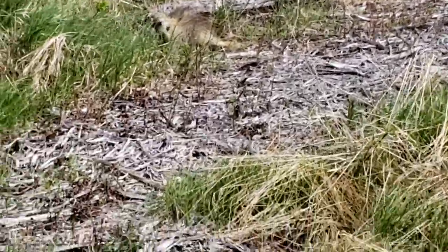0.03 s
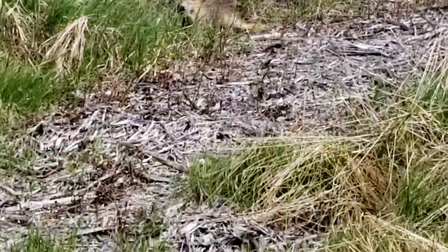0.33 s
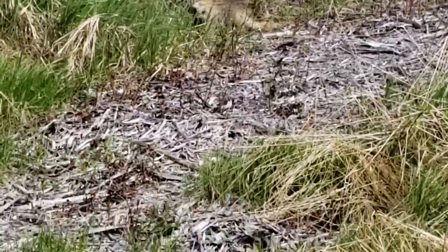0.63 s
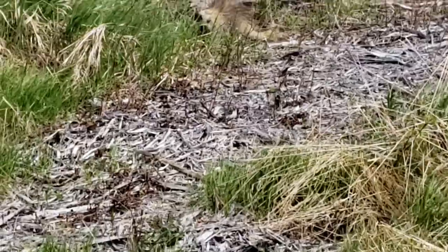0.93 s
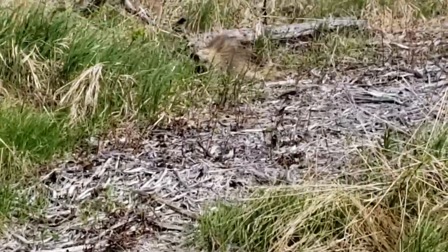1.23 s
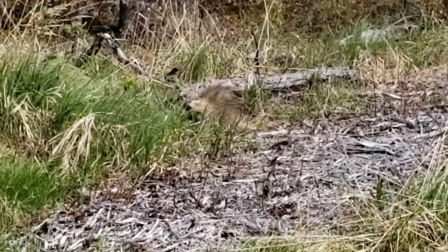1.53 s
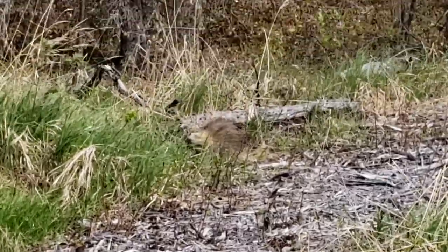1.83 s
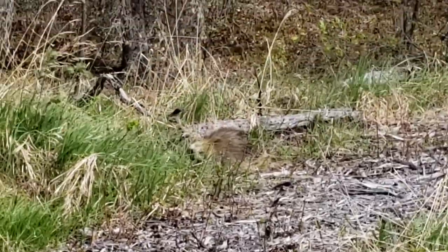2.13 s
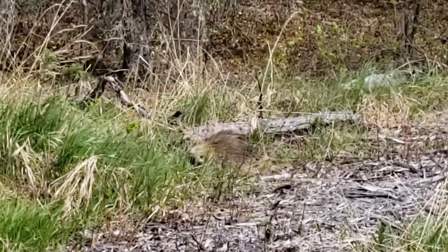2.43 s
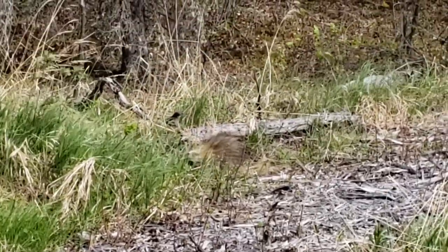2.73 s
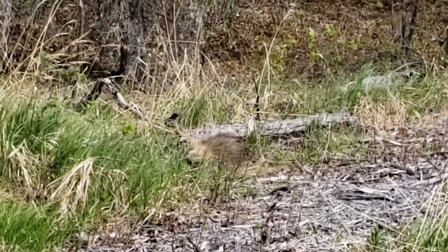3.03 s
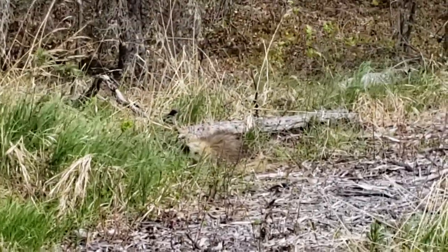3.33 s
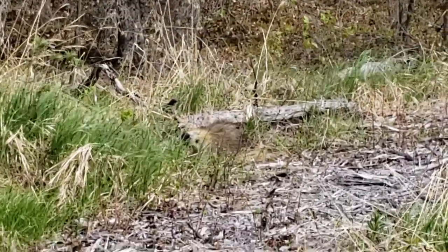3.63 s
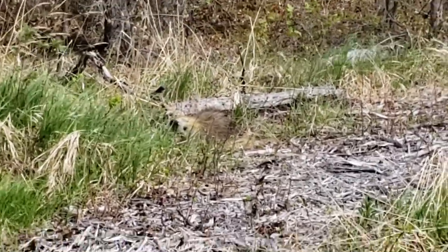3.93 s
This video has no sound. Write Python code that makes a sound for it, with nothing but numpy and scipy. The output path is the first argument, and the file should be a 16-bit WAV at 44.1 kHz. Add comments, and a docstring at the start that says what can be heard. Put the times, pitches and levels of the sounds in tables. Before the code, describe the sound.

Wind buffets a hand-held microphone with a low rumble and a few hollow knocks, then fades into quiet outdoor hiss. Twigs tick, a small bird whistles faintly, and one slow step crunches dry leaves close by.

```python
"""Gust at the edge of a wood

Wind buffets the two ports of a hand-held stereo microphone, with a few hollow handling knocks,
then dies away into quiet outdoor hiss.
Dry twigs and leaves tick on the ground, then crack and crunch under one slow step close by.
Farther off, to the left, a small bird whistles three times and the trees echo it."""
import sys
import numpy as np
from scipy import signal
from scipy.fft import rfft, irfft, next_fast_len
from scipy.io import wavfile
from scipy.ndimage import map_coordinates

SR = 44100
rng = np.random.default_rng(int(sys.argv[2]) if len(sys.argv) > 2 else 0)


def digitize_waveform(pressure):
    """Quantize a signal to 16-bit integers and store it at the path in sys.argv[1].

    Rows of a 2-D input are taken as channels; values are limited to [-1, 1].
    """
    field = np.atleast_2d(pressure).T
    bounded = np.clip(field, -1, 1)
    quanta = np.round(bounded * 32767).astype(np.int16)
    wavfile.write(sys.argv[1], SR, quanta)


N = 4 * SR


def amp(db):
    """Decibels to gain."""
    return 10 ** (np.asarray(db) / 20)


def unit(x):
    """Scaled to rms 1."""
    return x / np.sqrt(np.mean(x ** 2) + 1e-20)


def along(points, hz):
    """Read (f/Hz, value) points on a log frequency axis."""
    f, values = np.transpose(points)
    return np.interp(np.log(hz + 1), np.log(f + 1), values)


def curves(rows):
    """One value per sample for each column after the time."""
    times, *columns = np.transpose(rows)
    return [np.interp(np.arange(N) / SR, times, column) for column in columns]


def wobble(rate):
    """A smooth random curve for each port, rate knots a second."""
    knots = rng.standard_normal((2, 1000))
    return np.array([map_coordinates(k, [np.arange(N) * rate / SR], mode="mirror") for k in knots])


def filtered(x, response):
    """x through a frequency response."""
    n = x.shape[-1]
    padded = next_fast_len(n + 2048)
    return irfft(rfft(x, padded) * response(np.fft.rfftfreq(padded, 1 / SR)), padded)[..., :n]


def coloured(x, spectrum):
    """x shaped by a spectrum, rms 1."""
    return unit(filtered(x, lambda hz: amp(along(spectrum, hz))))


def noise(spectrum, n=N):
    """Unrelated noise in the two ports, rms 1."""
    return coloured(rng.standard_normal((2, n)), spectrum)


def pan(db):
    """Left and right gains, db apart, of mean power 1."""
    gains = amp([db / 2, -db / 2])
    return gains / np.sqrt(np.mean(gains ** 2, axis=0))


def add(out, start_s, x):
    """Mix x into out at start_s."""
    i = max(round(start_s * SR), 0)
    part = out[..., i:i + x.shape[-1]]
    part += x[..., :part.shape[-1]]


def swell(t, rise_s):
    """Rises to 1 at rise_s and dies away."""
    return t / rise_s * np.exp(1 - t / rise_s)


# Colour of the open air: f/Hz, relative level/dB
AIR_SPECTRUM = [(30, -2.5), (80, 0.5), (170, -10), (420, 3), (650, 0), (900, -3), (1400, -4), (2600, -6),
                (3800, 0.5), (6500, 0.5), (7300, -2), (8700, -21.5), (11000, -13), (13000, -14),
                (15500, -6)]
# Its lean across the microphone: f/Hz, left minus right/dB
AIR_PAN = [(400, 1.5), (1500, 1), (2600, 2), (4000, 0.5), (6500, 3.5), (9000, -2.5), (15000, -9.5)]
# Its slow fall: t/s, level/dB
AIR_LEVEL = [(0, -60.5), (2.9, -63.5)]


def air():
    """Quiet outdoor hiss all around the microphone."""
    level_db, = curves(AIR_LEVEL)
    return amp(level_db) * filtered(noise(AIR_SPECTRUM), lambda hz: pan(along(AIR_PAN, hz)))


# Top hiss at the right port: t/s, level/dB, power share of the wide band/0-1
SIZZLE_LEVEL = [(0, -61.5, 0.6), (.65, -61, 1), (.85, -64.5, 0.24), (2.5, -67, 0), (2.9, -68.5, 0)]
# Its wide band: f/Hz, relative level/dB
SIZZLE_WIDE = [(8000, -27.5), (10000, -18), (11500, -11), (15500, -9)]
# Its narrow band: f/Hz, relative level/dB
SIZZLE_NARROW = [(9000, -52), (12500, -37.5), (14000, 0), (15500, 0)]


def sizzle(left_db=-9):
    """A thin hiss at the very top, mostly on the right, that narrows as it fades."""
    level_db, wide = curves(SIZZLE_LEVEL)
    hiss = np.sqrt(wide) * noise(SIZZLE_WIDE) + np.sqrt(1 - wide) * noise(SIZZLE_NARROW)
    return amp(level_db) * hiss * amp([[left_db], [0]])


# Calls from the edge of the wood: t/s, level/dB, held pitch f/Hz
CALLS = [(1.026, -48, 3550), (3.052, -53.5, 3705), (3.476, -52.5, 3660)]
# Course of one call: t/s from its start, ratio to the held pitch, added level/dB
CALL_SHAPE = [(0, .98, -10), (0.022, 1, 2), (0.044, .98, -5.5), (.056, 0.74, 2.5), (0.068, 0.595, 1)]


def bird(rasp=2):
    """A thin whistle holds, then flicks down; the further it drops, the more its pitch scatters."""
    age, ratio, shape_db = np.transpose(CALL_SHAPE)
    out, t = np.zeros(N), np.arange(int(age[-1] * SR)) / SR
    glide = np.interp(t, age, ratio)
    envelope = amp(np.interp(t, age, shape_db)) * signal.windows.tukey(len(t), 0.1)
    for start_s, db, held_hz in CALLS:
        pitch_hz = held_hz * (glide + rasp * (1 - glide) * rng.standard_normal(len(t)))
        add(out, start_s, amp(db) * envelope * np.sin(2 * np.pi * np.cumsum(pitch_hz) / SR))
    return out


def from_trees(call, lag_s=0.00018, lean_db=3, echo_t60_s=0.7, echo_db=-11):
    """A call from the left reaches the right port later and softer; the trees add a diffuse echo."""
    at_ports = filtered(call, lambda hz: np.exp(-2j * np.pi * hz * np.array([[0], [lag_s]])))
    direct = at_ports * pan(lean_db)[:, None]
    t = np.arange(SR // 2) / SR
    tail = rng.standard_normal((2, len(t))) * amp(-60 * t / echo_t60_s)
    echo = signal.fftconvolve(call[None], tail / np.linalg.norm(tail[0]), axes=1)[:, :N]
    return direct + amp(echo_db) * echo


# Colour of dry leaves and twigs at close range: f/Hz, relative level/dB
LITTER_SPECTRUM = [(100, -49.5), (350, -9.5), (800, -1), (1300, -6.5), (2200, 0.5), (4000, 0), (6400, 3),
                   (7300, -2.5), (8800, -19.5), (11000, -10), (13500, -10), (15500, -2)]
# Weight of the step on the litter: t/s, relative level/dB
STEP_WEIGHT = [(2.98, -74.5), (3.13, -59), (3.23, -58.5), (3.32, -71.5), (3.615, -64), (3.636, -49.5),
               (3.665, -45.5), (3.7, -53), (3.716, -48), (3.76, -55.5), (3.82, -45.5), (3.84, -54.5),
               (3.875, -50), (3.905, -55), (3.93, -47.5), (3.97, -55), (4, -55)]


def crunch(cracks_per_s=6000, spread_db=6.5, clumps_db=1, crackle_db=0.5, swish_db=-7):
    """Under a foot close by, dry litter gives way in clumps of tiny cracks over a soft swish."""
    weight_db, = curves(STEP_WEIGHT)
    pressed = np.arange(N) / SR > STEP_WEIGHT[0][0]
    cracks = (rng.random((2, N)) < cracks_per_s / SR) * np.sign(rng.standard_normal((2, N)))
    sizes = amp(spread_db * np.clip(rng.standard_normal((2, N)), -2, 2))
    clumps = amp(clumps_db * wobble(rate=110)[0])
    crackle = amp(crackle_db) * coloured(cracks * sizes * clumps, LITTER_SPECTRUM)
    swish = amp(swish_db) * noise(LITTER_SPECTRUM)
    return pressed * amp(weight_db) * (crackle + swish)


def twig_response(hz, ring_hz, q=2.4, body_ratio=0.34, body_min_hz=666, body_db=-6.5):
    """A twig resonates in a high ring and a weaker, low woody mode, both coloured like the litter."""
    body_hz = max(body_ratio * ring_hz, body_min_hz)
    ring, body = (1 / abs(1 + 1j * q * (hz / f - f / (hz + 1))) for f in (ring_hz, body_hz))
    return amp(along(LITTER_SPECTRUM, hz)) * (ring + amp(body_db) * body)


# Twigs breaking near the microphone: t/s, relative level/dB, ring f/Hz, added splinter level/dB
TWIG_SNAPS = [(.0069, -32, 3600, -24), (0.0614, -38.5, 3970, -13.5), (0.1208, -42, 6910, -3.5),
              (0.222, -45, 4960, -3), (0.2712, -36, 910, -31), (1.2572, -46.5, 3980, -26.5),
              (2.1185, -51, 4500, -6.5), (2.3198, -44, 3270, -33), (2.4325, -43.5, 4900, -17.5),
              (2.438, -40.5, 4430, -35), (2.4748, -41, 4060, -22), (2.5276, -48.5, 4910, -6.5),
              (3.0023, -44.5, 4100, -22), (3.0432, -39.5, 5900, -15.5), (3.0585, -37.5, 4530, -10),
              (3.1184, -37, 4570, -4.5), (3.1653, -38, 1600, -26), (3.647, -33, 4570, -30.5),
              (3.6627, -28.5, 4250, -40), (3.6798, -35, 2800, -26.5), (3.8082, -28.5, 4810, -32),
              (3.8159, -30, 4800, -34), (3.8307, -31, 1480, -33), (3.665, -31, 4000, -30.5),
              (3.8757, -26.5, 6350, -22), (3.8893, -34, 6120, -26.5), (3.9289, -33, 5640, -34),
              (3.9354, -34, 4150, -36), (3.9419, -36, 4470, -29.5), (3.9815, -26.5, 3300, -34.5)]
# Colour of the splinters: f/Hz, relative level/dB
SPLINTER_SPECTRUM = [(5000, -30), (7000, 2), (9000, -5), (11000, -2), (13000, 1), (15500, 7)]


def snaps(rise_s=0.00085, ring_db=-8.5, spray_db=4.5, crumble_s=0.0031, crumble_db=-17.5):
    """Each fracture rings the wood and sprays bright splinters; fibres tear on briefly after it."""
    out, t = np.zeros((2, N)), np.arange(SR // 64) / SR
    fracture = swell(t, rise_s) ** 2 + amp(crumble_db) * swell(t, crumble_s)
    for start_s, db, ring_hz, splinter_db in TWIG_SNAPS:
        burst = rng.standard_normal((2, len(t)))
        ring = amp(ring_db) * unit(filtered(burst, lambda hz: twig_response(hz, ring_hz)))
        spray = amp(spray_db + splinter_db) * noise(SPLINTER_SPECTRUM, len(t))
        add(out, start_s, amp(db) * fracture * (ring + spray))
    return out


# How alike the two ports hear the ground: f/Hz, correlation
GROUND_LIKENESS = [(300, 1), (3000, 0.54), (7000, 0.56), (11000, -0.18)]
# Its lean across the microphone: f/Hz, left minus right/dB
GROUND_PAN = [(300, 1.5), (3000, 2.5), (7000, 2), (10000, 3), (12500, -5.5), (15500, -1)]


def from_ground(pair):
    """Two unrelated signals become one source underfoot, a little to the left and wider in the treble."""
    def mid_side_gains(hz):
        angle = np.arccos(along(GROUND_LIKENESS, hz)) / 2
        return np.array([np.cos(angle), np.sin(angle)])

    mid, side = filtered(pair, mid_side_gains)
    return filtered(np.array([mid + side, mid - side]), lambda hz: pan(along(GROUND_PAN, hz)))


# Wind on the left port: t/s, relative level/dB
BUFFET_LEFT = [(0.0, -39), (0.45, -38), (0.52, -62), (0.6, -35.5), (0.7, -52), (0.9, -28), (1.1, -33),
               (1.26, -39.5), (1.78, -51.5), (1.9, -58), (2.22, -73), (2.37, -79.5), (2.43, -46),
               (2.8, -67.5), (3.41, -80.5), (3.48, -51.5), (3.59, -62), (3.66, -84)]
# Wind on the right port: t/s, relative level/dB
BUFFET_RIGHT = [(0.0, -42), (0.06, -37), (0.14, -69), (0.28, -45.5), (0.65, -38), (0.95, -20), (1.12, -34),
                (1.33, -61), (1.76, -55), (1.96, -73), (2.55, -98.5), (2.62, -52), (2.75, -98), (3.1, -69),
                (3.42, -89), (3.57, -59), (3.68, -82)]
# Colour of the buffeting: f/Hz, relative level/dB
RUMBLE_SPECTRUM = [(15, -33), (28, -13), (40, -4), (60, 0.5), (85, 0), (120, -7), (170, -16), (300, -21),
                   (700, -75.5), (2000, -110)]


def wind_rumble(lumps_db=3, ceiling_db=-31.5, trim_db=-0.5):
    """Wind buffets each port separately with a low, lumpy rumble that levels off in the hardest gusts."""
    buffet_db = np.vstack([curves(BUFFET_LEFT), curves(BUFFET_RIGHT)])
    rumble = unit(noise(RUMBLE_SPECTRUM) * amp(lumps_db * wobble(rate=25.95)))
    return amp(np.minimum(buffet_db, ceiling_db) + trim_db) * rumble


# Ragged wind flutter, then a soft handling scuff near 3.4 s: t/s, relative level/dB
FLUTTER_SCUFF_LEVEL = [(0, -47), (.3, -46), (.45, -49.5), (.66, -44.5), (.75, -29.5), (.865, -40.5),
                       (.895, -27), (1.02, -41), (1.11, -38.5), (1.23, -39.5), (1.32, -59.5), (1.5, -54),
                       (1.9, -73), (2.35, -92), (2.45, -62.5), (2.8, -89.5), (3.27, -88.5), (3.38, -71),
                       (3.5, -72)]
# Colour of both: f/Hz, relative level/dB
FLUTTER_SCUFF_SPECTRUM = [(70, -36.5), (120, 5), (160, 4), (240, -0.5), (400, 0.5), (480, -4.5),
                          (620, -11.5), (900, -23.5), (1400, -36.5), (2500, -48), (6000, -100)]


def flutter_and_scuff(lumps_db=5, trim_db=2.5):
    """Wind tears raggedly at the ports, above the rumble; later a hand softly scuffs the microphone."""
    level_db, = curves(FLUTTER_SCUFF_LEVEL)
    ragged = unit(noise(FLUTTER_SCUFF_SPECTRUM) * amp(lumps_db * wobble(rate=70)))
    return amp(level_db + trim_db) * ragged


# Low wind thumps and hollow handling knocks (near 400 Hz) on the microphone:
# t/s, relative level/dB, ring f/Hz, left minus right/dB
THUMPS_AND_KNOCKS = [(.027, -26.5, 73, -2), (0.339, -29, 360, -7), (.416, -32.5, 112, -1),
                     (0.595, -23.5, 118, 1), (.671, -31, 434, -2), (0.679, -25.5, 79, -25),
                     (.741, -24, 392, 5), (.796, -26.5, 347, 0), (0.834, -26, 128, 6), (0.891, -22, 390, 4),
                     (.935, -19.5, 136, 1), (1.045, -23.5, 75, 3), (1.192, -21.5, 113, 5),
                     (1.278, -29, 91, 2), (1.381, -34, 97, -1), (2.017, -48.5, 59.7, 3),
                     (2.417, -37.5, 63.4, 36), (2.44, -47.5, 450, -20), (3.377, -54.5, 460, 4),
                     (3.458, -48.5, 66.6, 10)]


def thumps_and_knocks(rise_s=0.003, rise_cycles=0.42, waver=0.22, in_step_hz=111, trim_db=1):
    """Wind thumps and handling knocks ring briefly; the knocks reach both ports more alike."""
    out, t = np.zeros((2, N)), np.arange(SR // 10) / SR
    for start_s, db, hz, lean_db in THUMPS_AND_KNOCKS:
        apart = min(1, in_step_hz / hz)
        port_hz = hz * np.exp(waver * apart * rng.standard_normal((2, 1)))
        cycles = port_hz * t + apart * rng.random((2, 1))
        ring = swell(t, rise_s + rise_cycles / hz) ** 2 * np.sin(2 * np.pi * cycles)
        add(out, start_s, amp(db + trim_db) * pan(lean_db)[:, None] * ring)
    return out


def scene():
    """Wind and handling right on the microphone, litter underfoot, bird and open air beyond."""
    on_microphone = wind_rumble() + flutter_and_scuff() + thumps_and_knocks()
    litter = from_ground(snaps() + crunch())
    return on_microphone + litter + from_trees(bird()) + air() + sizzle()


def record(dry):
    """The hand-held recorder keeps nothing above 15.9 kHz."""
    return filtered(dry, lambda hz: hz < 15900)


dry = scene()
out = record(dry)
digitize_waveform(out)
```